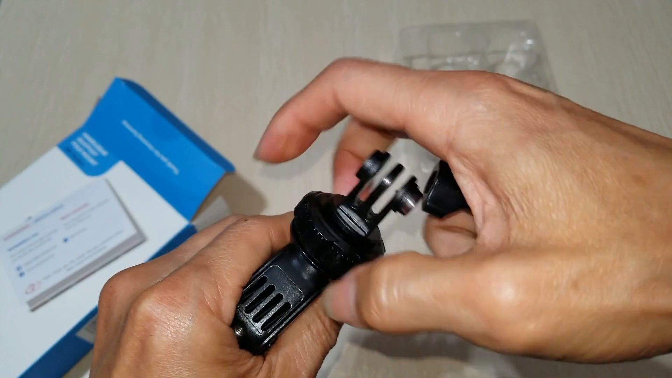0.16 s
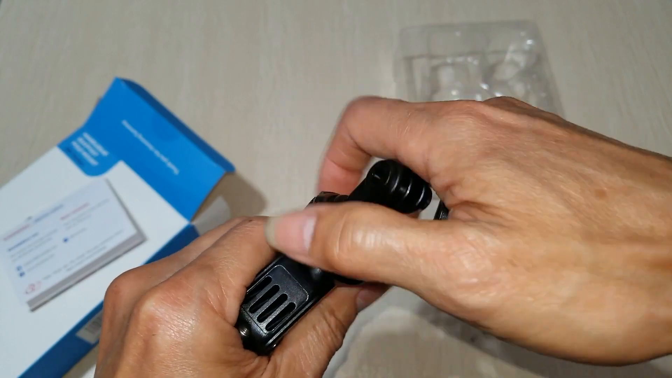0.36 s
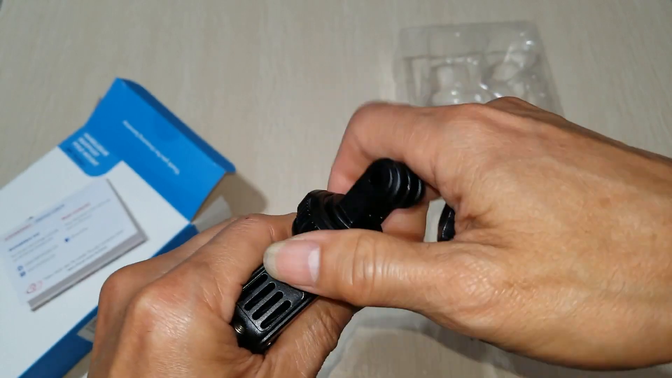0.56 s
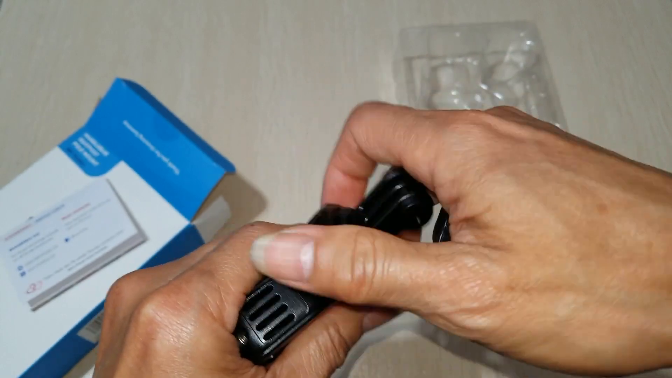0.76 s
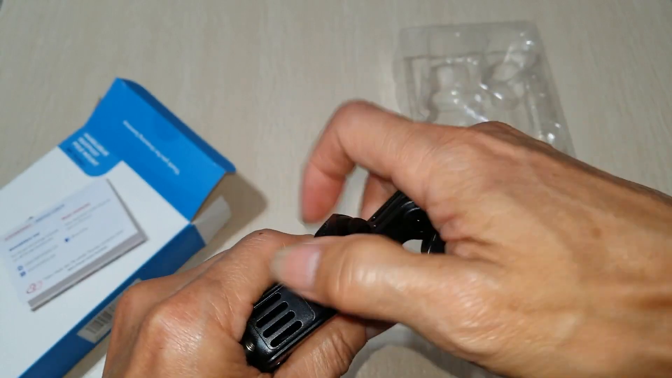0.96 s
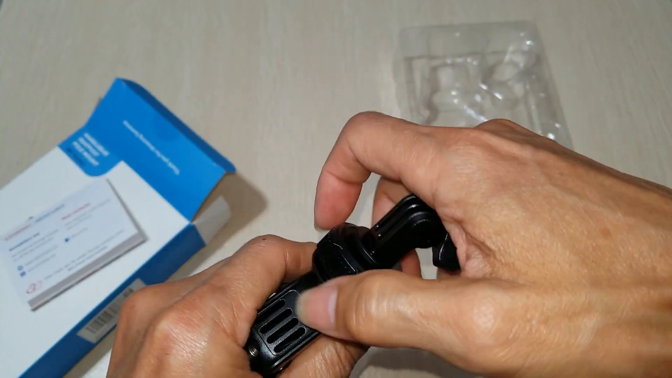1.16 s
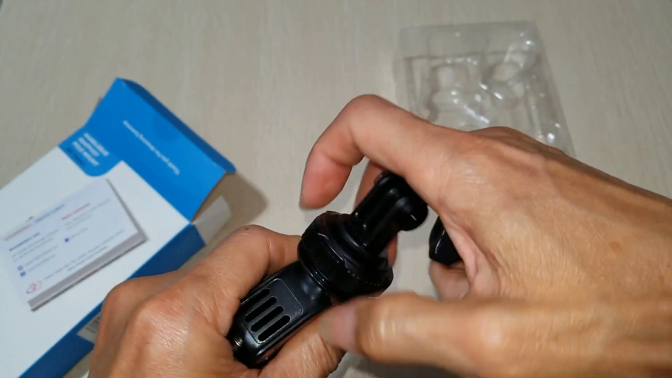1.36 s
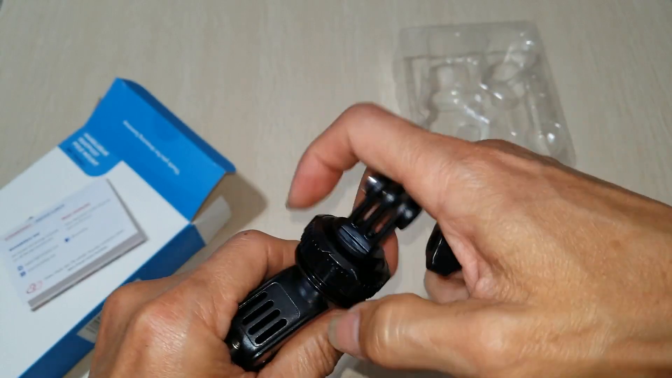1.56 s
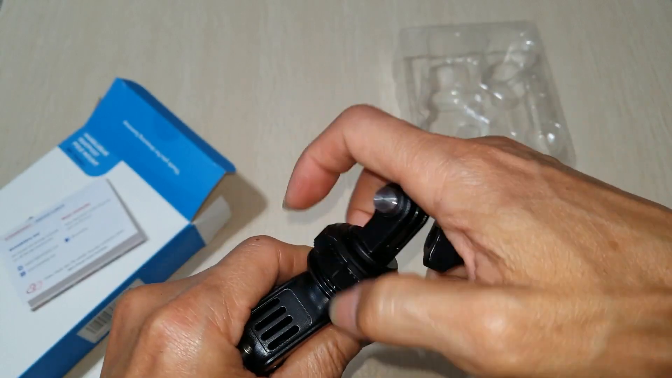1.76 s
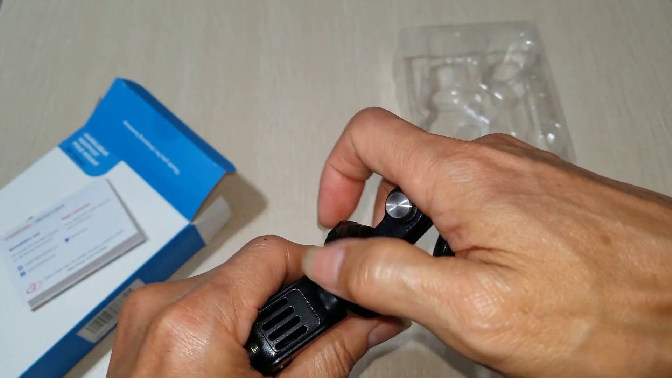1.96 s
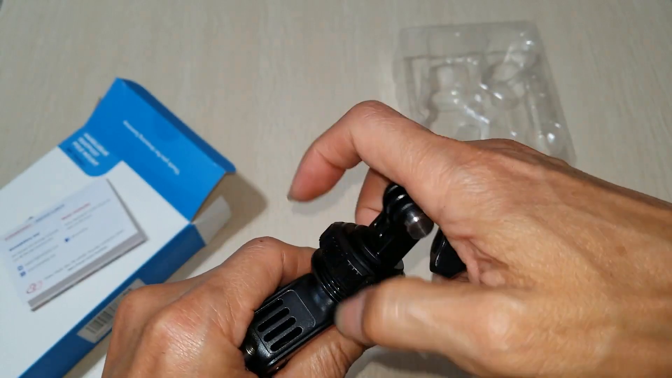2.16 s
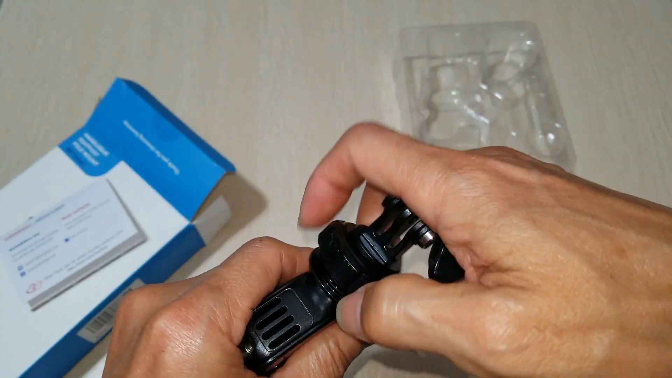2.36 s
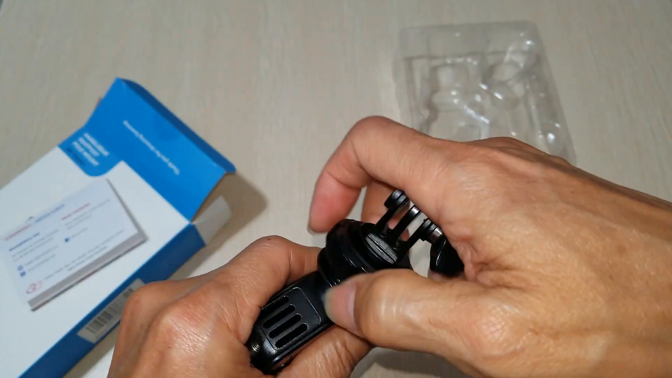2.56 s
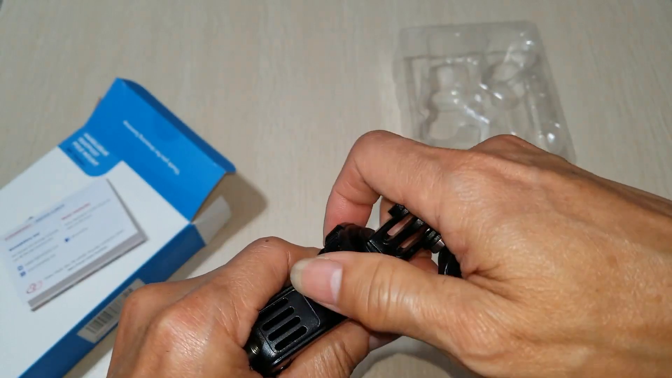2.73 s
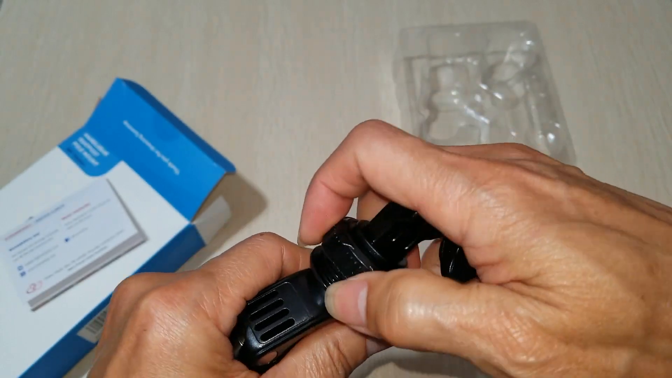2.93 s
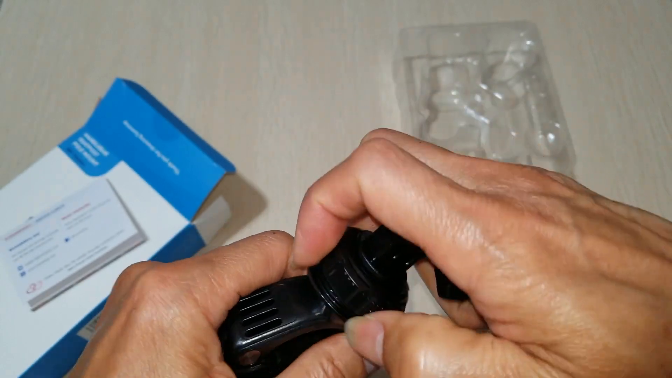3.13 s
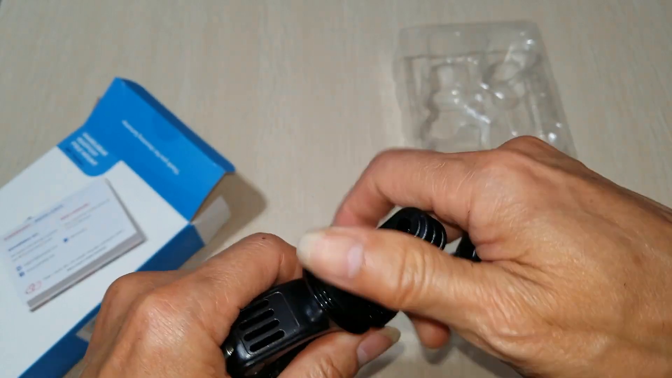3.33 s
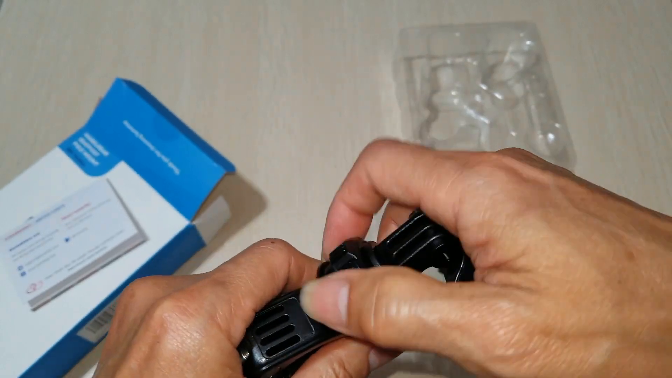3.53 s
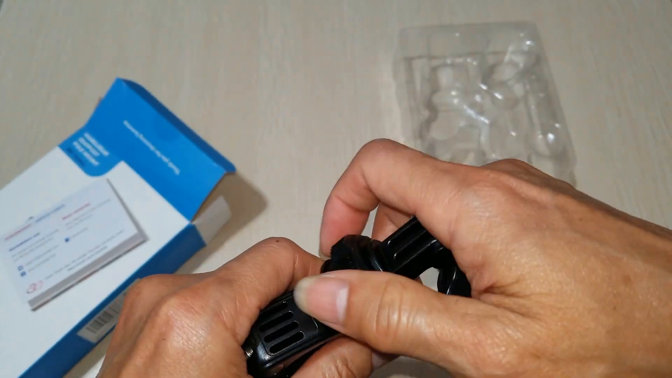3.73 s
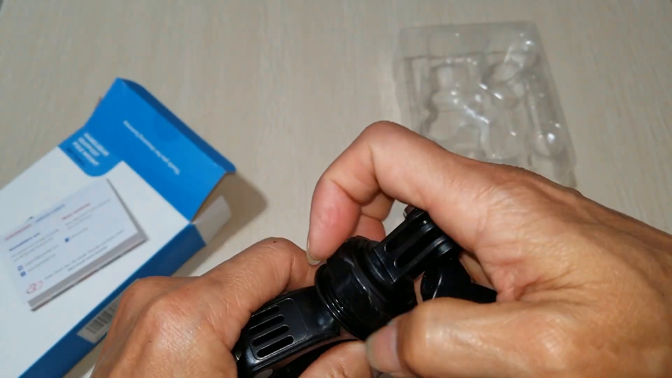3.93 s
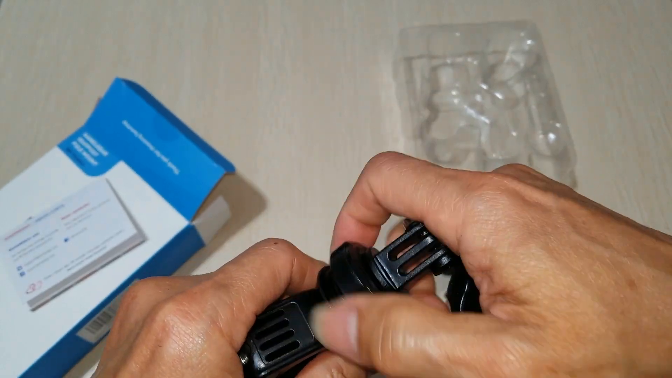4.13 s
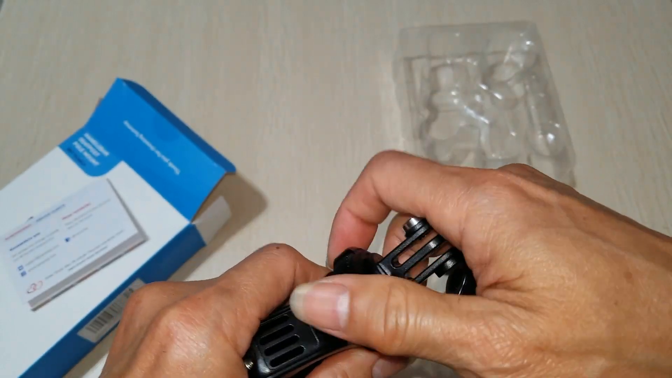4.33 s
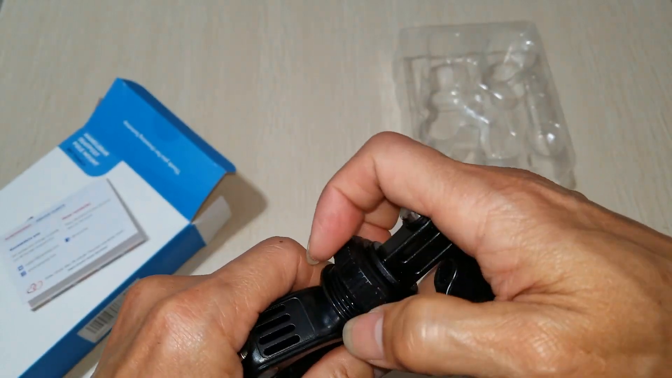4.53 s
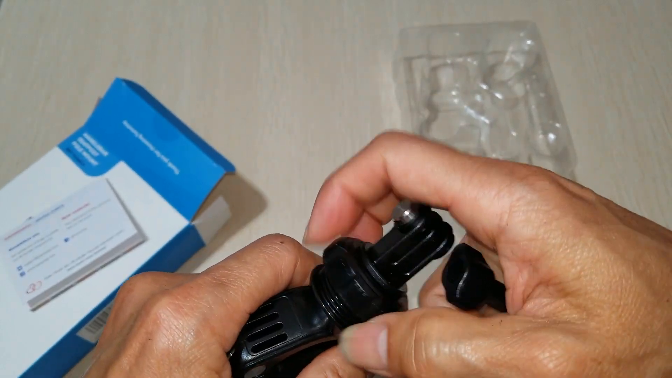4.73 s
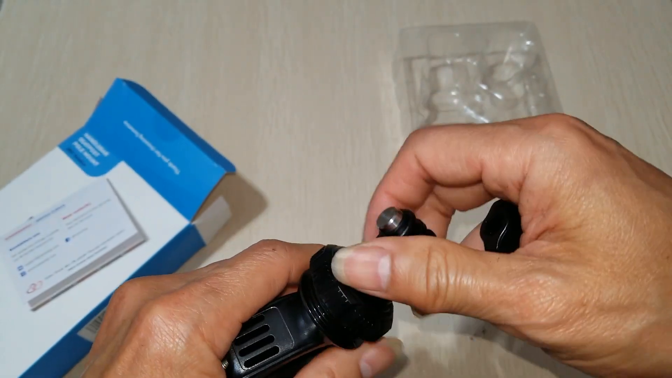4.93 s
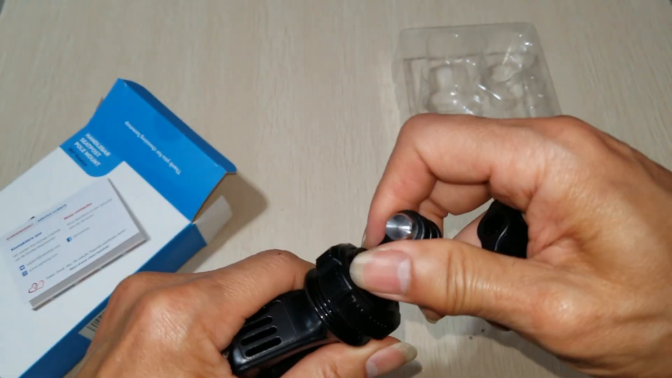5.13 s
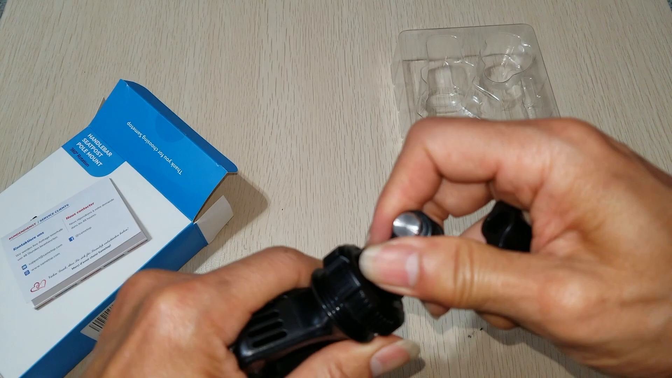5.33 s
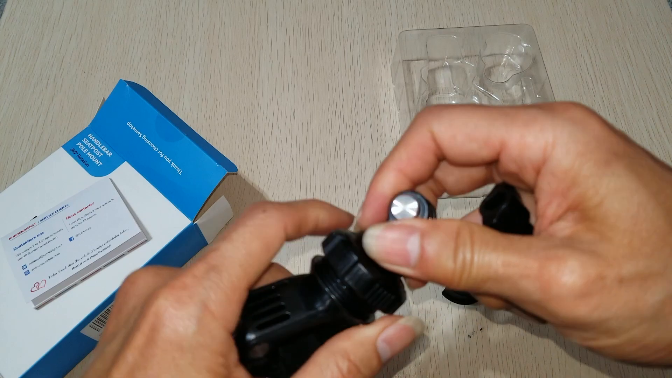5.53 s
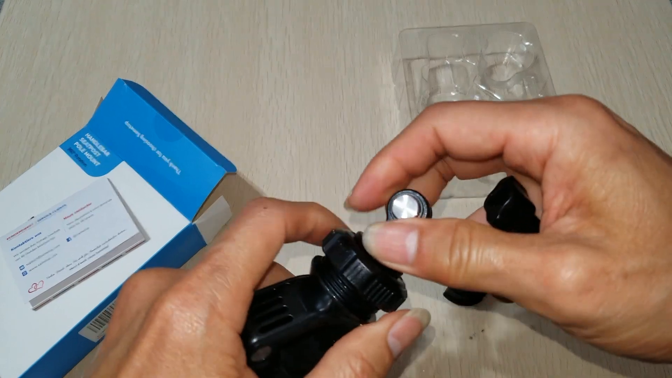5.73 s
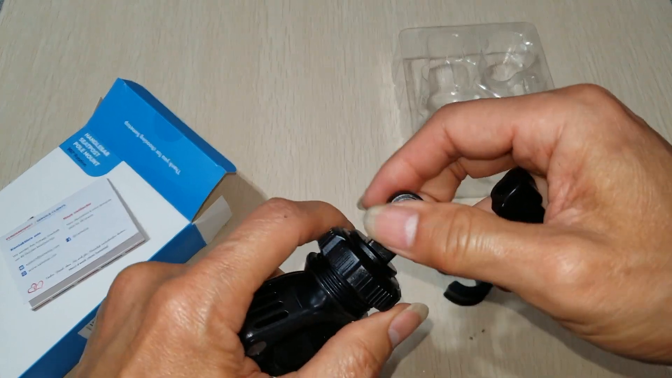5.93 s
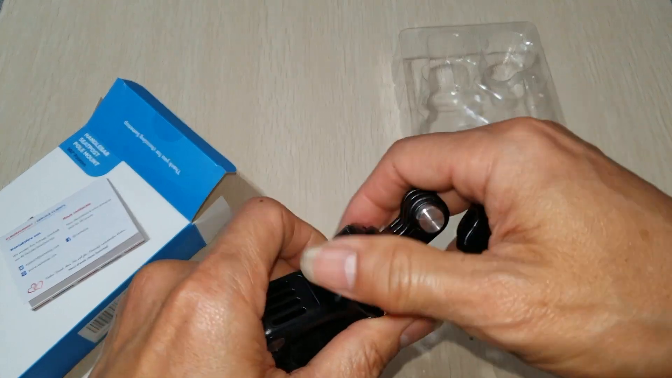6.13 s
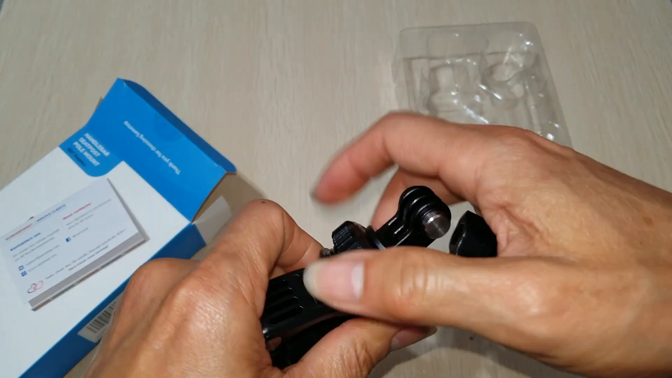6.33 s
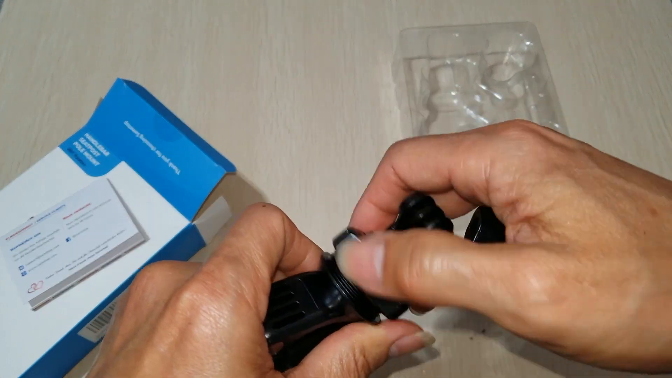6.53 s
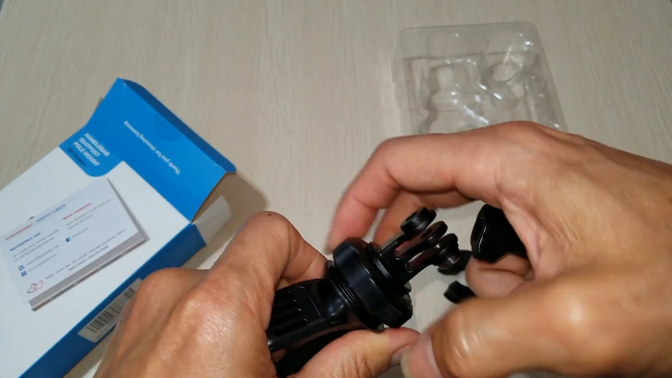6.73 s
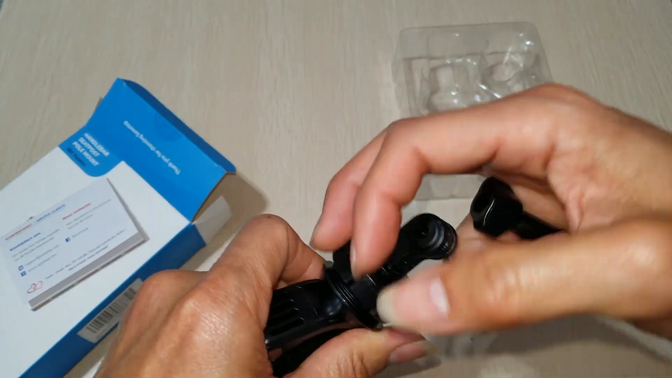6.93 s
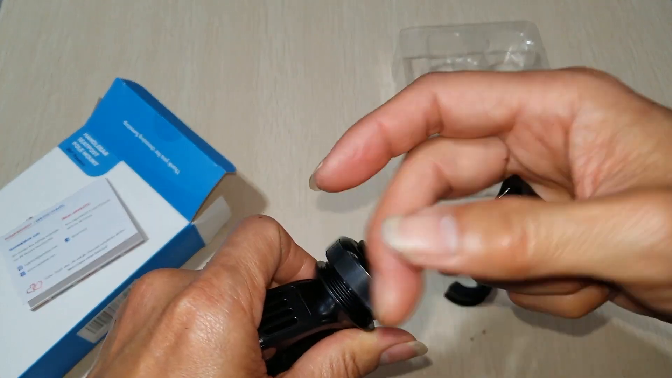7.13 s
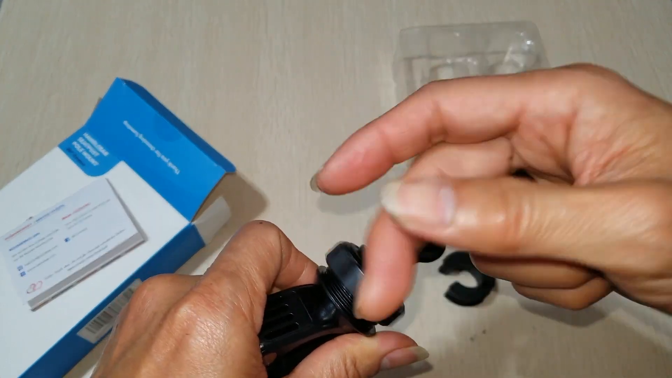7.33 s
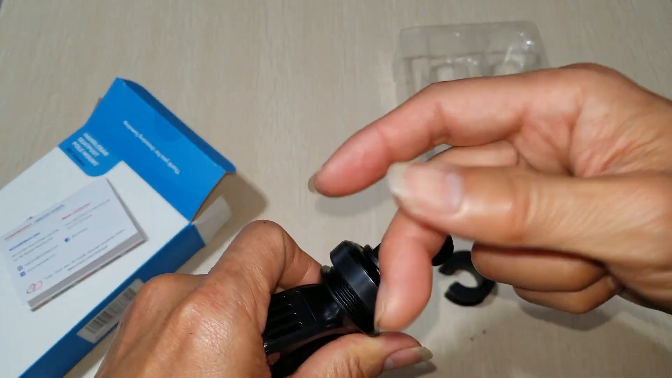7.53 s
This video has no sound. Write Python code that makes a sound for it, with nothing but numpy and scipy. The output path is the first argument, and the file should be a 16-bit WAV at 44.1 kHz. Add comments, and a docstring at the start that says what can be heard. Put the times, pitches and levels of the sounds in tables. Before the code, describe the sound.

Hard plastic parts click, tick and grind as fingers rotate a small mount joint right beside the microphones. Irregular bursts run about ten to twenty-five knocks a second, some dull, some sharp and bright. Activity is steady at first, breaks briefly, resumes, nearly stops past the middle, then grows busy and strong. The sound leans left, with little bass in the clicks, a tight room tail, and faint hiss over low rumble.

```python
"""A loose plastic swivel joint is turned by hand close to a pair of small microphones in a quiet room. It
knocks and rattles in short bursts, where tiny contacts ring its modes, and grinds as rough faces slide. Dense
decaying noise gives the brief echoes of the room; a short low pop sounds under the two sharpest knocks. Below
lie bass rumble that swells and hiss, both made of coloured noise, louder on the left."""
import sys
import numpy as np
from scipy import signal
from scipy.fft import rfft, irfft
from scipy.io import wavfile
from scipy.ndimage import uniform_filter1d

SR = 44100
rng = np.random.default_rng(int(sys.argv[2]) if len(sys.argv) > 2 else 0)


def log_audio(samples):
    """Write samples as a 16-bit WAV file to the path given in sys.argv[1]."""
    # one column per channel
    frames = np.atleast_2d(samples).T
    # limit to full scale, then quantise
    limited = np.clip(frames, -1, 1)
    pcm = np.round(limited * 32767).astype(np.int16)
    wavfile.write(sys.argv[1], SR, pcm)


N = 334719   # samples

# Knocks of the loose parts. Each row: moment of the main blow in seconds, level of the body ring in dB
# before the room answers, treble against body in dB, rattle length in ms (held to 0.2-12 when used).
KNOCKS = [(0.0406, -28.5, -23, 5.9), (0.063, -28, -12, 2.2), (0.0732, -18.5, -6.5, 1),
          (0.1327, -16, -7.5, 6.2), (0.1442, -24, -9, 2.2), (0.2095, -25, -13.5, 11),
          (0.2425, -23, -17, 1.2), (0.25, -25, -24, 1.2), (0.281, -23, -15, 4.1), (0.3037, -14, -11.5, 1.7),
          (0.363, -18, -11, 3.7), (0.379, -9.5, -2, 1.9), (0.3866, -19, 2, 2.8), (0.444, -15, -1.2, 3.1),
          (0.4695, -19.5, -7, 1.8), (0.5845, -22.5, -15, 0.67), (0.6311, -18.5, -10, 3.2),
          (0.698, -31, -3, 11), (0.7137, -31, -27, 3.1), (0.766, -28, -8, 3.6), (0.7807, -14, -21, 1.04),
          (0.7864, -16.5, -9, 2), (0.841, -33, -3, 7.8), (0.891, -33.5, -30, 1.8), (0.9228, -26, -23, 2.6),
          (0.9864, -37.5, -28, 0.68), (0.996, -43, 6.5, 2.2), (1.0157, -25.5, -10.5, 1.6),
          (1.0324, -27, -19, 3.2), (1.0768, -28.5, -18, 4.9), (1.108, -30, -19, 4.4),
          (1.1369, -20, -15.5, 1.1), (1.2107, -19.5, -17, 4), (1.238, -18, -11, 0.31),
          (1.2435, -24, -11, 3.7), (1.271, -21, -4.5, 4.5), (1.287, -32, -3, 4), (1.312, -23, -17, 3.5),
          (1.3293, -19.5, -6, 12), (1.339, -17.5, -23, 1.7), (1.3462, -21, -6.5, 0.9),
          (1.3827, -35, -28, 3.5), (1.4416, -26, -10, 2.4), (1.4755, -29.5, -13.5, 5.5),
          (1.4819, -30, -34, 3.9), (1.4948, -27, -12, 0.88), (1.5435, -18, -9, 5.7),
          (1.5649, -23, -9.5, 1.8), (1.5768, -19.5, -15, 0.66), (1.6529, -24.5, -25, 1.3),
          (1.6787, -23, -12, 1.5), (1.6938, -16.5, -5.5, 5.8), (1.7002, -17.5, 2, 0.57),
          (1.7117, -23, -21, 2.7), (1.828, -33.5, -17, 0.58), (1.8572, -29.5, -13, 1.5),
          (1.921, -35, -12, 1.5), (1.9419, -24, -15, 2.1), (2.0592, -27, -10.5, 2.4),
          (2.0882, -30.5, 1, 2.9), (2.1334, -24, -7.5, 9.9), (2.1422, -25, -12, 2.4),
          (2.1571, -28, -14, 1.2), (2.2324, -26, -11, 4.1), (2.2645, -22.5, -12.5, 1.9),
          (2.305, -31.5, 0.5, 1.5), (2.3648, -28, -10.5, 9.2), (2.468, -33.5, -5, 2.3),
          (2.484, -19, -4, 2.3), (2.49, -24.5, -5, 2.2), (2.57, -41, 2, 1.3), (2.581, -15, -11, 1.2),
          (2.5868, -10, 0.8, 4.2), (2.6868, -30.5, -13, 0.33), (2.7147, -47, -18, 2.1),
          (2.75, -34.5, -11, 0.21), (3.184, -18, 2.5, 2.5), (3.237, -29.5, -15, 3.9),
          (3.332, -26, -19, 5.8), (3.346, -15.5, 2.5, 1.6), (3.3731, -22.5, -25, 2.2),
          (3.4081, -17.5, -5, 0.67), (3.4482, -39, -18, 0.59), (3.463, -19.5, -6.5, 2.1),
          (3.537, -20, -11, 1.4), (3.5532, -21, -6, 5), (3.5632, -24.5, -9, 4.4),
          (3.5826, -21.5, -2.5, 2.7), (3.7081, -20, -12, 1.5), (3.943, -33.5, 0, 3.1),
          (3.9613, -15.5, 1, 1.1), (3.9756, -23, -16, 6.9), (4.0844, -36, -27, 2.6),
          (4.1231, -22.5, -7, 3.3), (4.1734, -17, 0, 1.6), (4.1799, -15.5, -6, 14),
          (4.202, -16.5, -10.5, 2.9), (4.255, -46, 3, 1.5), (4.2748, -22.5, -13, 2.3),
          (4.3185, -24.5, -8.5, 3.9), (4.388, -22.5, -10.5, 2.1), (4.402, -22.5, -8.5, 0.59),
          (4.724, -15.5, -0.5, 4.4), (4.8985, -30.5, 6, 2), (4.9174, -34, 11, 2.8), (4.9549, -33, -6, 0.93),
          (5.6026, -46.5, 0, 4.6), (5.9541, -40.5, -6, 0.76), (6.093, -40, -8, 1.7),
          (6.112, -23.5, -9.5, 2.3), (6.144, -16.5, -11, 1.5), (6.1745, -30.5, -8, 5),
          (6.2209, -20.5, -10, 4.1), (6.3375, -20.5, -0.5, 2.7), (6.395, -28.5, -10, 7.7),
          (6.4122, -19.5, -5, 2.8), (6.421, -35, -24, 1.8), (6.4997, -27.5, -9.5, 2.1), (6.527, -25, -4, 3),
          (6.541, -13, -4.5, 2.3), (6.5646, -13.5, -9.5, 1.9), (6.5849, -18, -19, 3.7),
          (6.663, -18, -12.5, 9.1), (6.6817, -21.5, -15, 2.8), (6.7216, -22, -21, 11),
          (6.7423, -26.5, -6, 3.5), (6.799, -30.5, -19, 3), (6.8568, -14.5, -16, 15),
          (6.8655, -28, -5, 1.4), (6.942, -24, -7, 2.3), (6.9529, -14.5, -15, 3.1),
          (6.9602, -14.5, -4, 3.8), (7.0399, -11, -4, 2.6), (7.0671, -23, -3, 5.7),
          (7.1176, -24, -4.5, 6.3), (7.2525, -11.5, -6, 4), (7.307, -22, -4.5, 14), (7.3423, -26, -2, 9.2),
          (7.3654, -23, -0.5, 12), (7.3793, -19.5, -4, 6.3), (7.4431, -8.5, -1.9, 1.6),
          (7.4783, -21, -4, 2), (7.5166, -29.5, -3.5, 6.8)]
# Modes of the plastic joint. Each row: middle pitch in Hz, relative level in dB, time to fall 60 dB in seconds.
MODES = [(740, -29, 0.012), (950, -9, 0.0056), (1225, -8.5, 0.017), (1572, -0.5, 0.0044),
         (1616, -7.5, 0.0041), (2044, 0.5, 0.0058), (2121, 2, 0.0089), (2490, -2, 0.0071),
         (2538, -3.5, 0.013), (2750, -7.5, 0.0062), (3014, -4.5, 0.0075), (3390, -1.5, 0.0063),
         (3734, -5, 0.0071), (4343, -2.5, 0.0064), (5370, 7, 0.0031), (6505, 1.5, 0.0083),
         (7270, -20, 0.042), (8330, 2.5, 0.0066), (9360, -9.5, 0.021), (10130, 3, 0.0045),
         (12050, -11.5, 0.018), (11570, -7.5, 0.0031), (12500, 3.5, 0.0028), (14400, 7, 0.0034)]
LEAD_MS = 5   # room for the rattle ahead of each main blow
ROLL_OFF_HZ = 15750   # where the top of the microphones ends


def from_db(db):
    """Decibels to gain."""
    return 10 ** (np.asarray(db) / 20)


def at_hz(points, hz):
    """Reads a (Hz, value) table on a log frequency axis."""
    point_hz, values = np.transpose(points)
    return np.interp(np.log(hz), np.log(point_hz), values)


def joint():
    """Knocks and grinding of one small body that radiates little bass, at two unequal distances."""
    small_body_hz, bass_left_db = 836, -17.5
    sound = knocks() + grinding(count=6)
    right_lag = 5   # samples: the right microphone is a little farther away
    sound[1] = np.roll(sound[1], right_lag)
    sound[1] = signal.lfilter(*signal.butter(1, 500, "high", fs=SR), sound[1])   # and thinner in the lows
    high_pass = signal.butter(5, small_body_hz, "high", fs=SR, output="sos")
    return signal.sosfilt(high_pass, sound) + from_db(bass_left_db) * sound


def knocks():
    """Each knock's force rings its body and treble modes, then the room."""
    s, level_db, treble_db, length_ms = np.transpose(KNOCKS)
    force = rattles(length_ms, count=1100)[:, None]
    centre_hz, cover_db = grip(s, treble_db)
    rings = bodies(treble_db, centre_hz, cover_db, count=600)
    body, treble = [peak_one(signal.fftconvolve(force, ring, axes=2)) for ring in rings]
    bursts = body + from_db(treble_db)[:, None, None] * treble
    bursts *= from_db(level_db)[:, None, None]
    bursts = signal.fftconvolve(bursts, echoes(len(s)), axes=2)
    length = bursts.shape[2]
    out = np.zeros((2, N + length))
    starts = np.round((s - LEAD_MS / 1000) * SR).astype(int)
    for start, burst in zip(starts, bursts):
        out[:, start:start + length] += burst
    return out[:, :N]


def rattles(length_ms, count):
    """The force of each knock: tiny contacts swell to a main blow and die away about four times slower."""
    t_ms = np.arange(count) / SR * 1000 - LEAD_MS
    length_ms = np.clip(length_ms, 0.2, 12)[:, None]
    swell = np.exp(np.where(t_ms < 0, t_ms / (0.52 * length_ms), -t_ms / (2.07 * length_ms)))
    blow = np.abs(t_ms) == np.abs(t_ms).min()
    ticks = contacts((len(length_ms), count), per_s=3900, spread_db=5.0)
    return ticks * swell + 2.77 * blow


def contacts(shape, per_s, spread_db):
    """Tiny contacts at random moments pushing either way, mostly weak, a few strong; rms 1."""
    sizes = from_db(spread_db * np.minimum(rng.exponential(1, shape), 4))
    pushes = sizes * rng.choice([-1, 1], shape)
    hits = pushes * (rng.random(shape) < per_s / SR)
    return hits / np.sqrt(np.mean(hits ** 2))


def bodies(treble_db, centre_hz, cover_db, count):
    """Stereo ring of body and of treble per knock: decaying sines, shifted and weighted anew each time."""
    # How much nearer the left microphone is. Each row: frequency in Hz, left against right in dB.
    nearer_left = [(770, 12), (1100, 9), (1500, 6), (2400, 5), (4400, 6), (8000, 9), (15000, 10.5)]
    treble_from_hz, pitch_spread_hz, level_spread_db = 4800, 35, 2
    hz, mode_db, t60 = np.transpose(MODES)
    # random parts per mode: pitch, common level, left level, right level
    luck = rng.standard_normal((len(treble_db), 4, len(MODES)))
    t = np.arange(count) / SR
    pitch_hz = hz + pitch_spread_hz * luck[:, 0]
    rings = np.sin(2 * np.pi * pitch_hz[:, :, None] * t) * from_db(-60 * t / t60[:, None])

    is_treble = hz > treble_from_hz
    centre_hz = centre_hz[:, None, None]
    softness = np.clip(-treble_db, 0, 30)[:, None, None]
    # where the blow lands leans the body up or down
    tilt_db = 25 * np.log2(centre_hz / 2350) * np.log2(np.clip(hz, 1300, 3400) / 2350)
    # soft blows reach only the modes near their centre
    narrow_db = -0.9 * softness * np.log2(hz / centre_hz) ** 2
    sides_db = at_hz(nearer_left, hz) * [[0.5], [-0.5]] + level_spread_db * luck[:, 2:]
    level_db = mode_db + cover_db + level_spread_db * luck[:, 1:2] + sides_db
    level_db = level_db + (tilt_db + narrow_db) * ~is_treble
    gains = from_db(level_db) * (-1) ** np.arange(len(hz))   # neighbouring modes start opposite ways
    # short waves: the right side may face the opposite lobe
    gains[:, 1] *= np.where(is_treble & (luck[:, 3] > 1), -1, 1)
    return (gains * ~is_treble) @ rings, (gains * is_treble) @ rings


def grip(s, treble_db):
    """How the fingers hold and cover the joint: centre of the ring in Hz and extra dB per mode at moments s."""
    # Each row: moment in seconds, centre of the body ring for a hard knock in Hz,
    # change of the lowest modes in dB, change of the highest modes in dB.
    holds = [(0.1, 2580, -8, -6), (0.7, 2770, 3.5, -2), (1.3, 2400, -2, 3), (2.1, 2480, -4.5, -0.5),
             (2.6, 2540, -3.2, -8), (3.5, 2550, 5, -4), (3.95, 2930, 4, -11), (4.12, 2310, -0.5, -4),
             (4.35, 2950, -1, -3), (4.73, 2900, -7, 6.5), (4.96, 2120, 1, 7), (6.2, 2960, -16, -1.5),
             (6.7, 2750, 2, -2.5), (7.4, 2870, -6, 3)]
    sag_hz_per_db = 23.5   # duller knocks ring lower
    lowest_to_hz, highest_from_hz = 1400, 11000
    moments, *columns = np.transpose(holds)
    centre_hz, low_db, high_db = [np.interp(s, moments, column) for column in columns]
    hz = np.transpose(MODES)[0]
    cover_db = low_db[:, None] * (hz < lowest_to_hz) + high_db[:, None] * (hz > highest_from_hz)
    return centre_hz + sag_hz_per_db * np.minimum(treble_db, 0), cover_db[:, None]


def peak_one(x):
    """Scales each stereo burst so that its loudest millisecond and a half has power 1, both sides summed."""
    power = uniform_filter1d(np.sum(x ** 2, axis=1), size=66, axis=1)
    return x / np.sqrt(power.max(axis=1))[:, None, None]


def echoes(positions):
    """Direct sound plus dense echoes from table and walls, separate for each joint position and channel."""
    first_db = -32.5   # the echoes per sample against the direct sound, ahead of their decay
    low_t60_s, treble_t60_s = 0.12, 0.14
    t = np.arange(SR // 7) / SR
    noise = rng.standard_normal((positions, 2, len(t)))
    low = signal.sosfilt(signal.butter(2, 4000, fs=SR, output="sos"), noise)
    tail = low * from_db(-60 * t / low_t60_s)
    tail += 0.71 * (noise - low) * from_db(-60 * t / treble_t60_s)
    tail *= from_db(first_db) * np.clip(t / 0.00087, 0, 1)   # the first echoes need a moment to arrive
    tail[:, :, 0] = 1   # direct sound
    return tail


def grinding(count):
    """Rough faces sliding: uneven ticks under the hand's effort, brighter where the knocks are brighter."""
    t = np.arange(N) / SR
    force = effort() * contacts(N, per_s=600, spread_db=4.5)
    s, _, treble_db, _ = np.transpose(KNOCKS)
    bright = from_db(0.5 * np.interp(t, s, treble_db) - 6)
    # the spot that touches is drawn anew every 200 samples
    spots = rng.integers(0, count, N // 200 + 1).repeat(200)[:N]
    rings = bodies(np.full(count, -11.0), np.full(count, 2200.0), 0, count=600)
    body, treble = [ring / np.std(ring) / np.sqrt(ring.shape[2]) for ring in rings]
    out = 0
    for k in range(count):
        ticks = (force * (spots == k))[None]
        out = out + signal.oaconvolve(ticks, body[k], axes=1)
        out = out + signal.oaconvolve(ticks * bright, treble[k], axes=1)
    return signal.oaconvolve(out, echoes(1)[0], axes=1)[:, :N]


def effort():
    """Strength of the grinding: scrapes rise, hold and fall; loose parts chatter up to and on after each knock."""
    # The hand pushes the joint round. Each row: start in seconds, length in seconds, relative level in dB.
    scrapes = [(-0.004, .13, -40), (0.255, 0.18, -42), (0.504, .1, -46.5), (0.62, .15, -37),
               (0.84, 0.097, -52), (0.978, .1, -44.5), (1.136, .06, -54), (1.238, 0.047, -34),
               (1.37, .06, -55), (1.47, 0.066, -35.5), (1.605, .05, -47), (1.665, 0.077, -33.5),
               (1.76, .1, -57), (1.89, 0.048, -54), (2.048, 0.056, -44), (2.221, .1, -40), (2.448, .1, -49),
               (3.132, 0.11, -45), (3.348, 0.11, -33.5), (3.525, 0.034, -33.5), (4.118, 0.018, -37),
               (4.316, .11, -46.5), (4.795, 0.22, -60.5), (5.439, 0.027, -57.5), (6.107, 0.12, -42),
               (6.352, 0.077, -38), (6.537, 0.023, -30.5), (6.696, 0.053, -38), (6.836, 0.034, -34.5),
               (6.937, 0.029, -50), (7.061, 0.098, -37.5), (7.273, 0.16, -34), (7.448, 0.018, -29.5),
               (7.519, 0.039, -38)]
    scrape_rise, scrape_fall = 689, 356   # dB per second
    shake_db, shake_rise, shake_fall = -21.5, 1899.5, 321   # dB against the knock's level, then dB per second
    t = np.arange(0, N, 64)[:, None] / SR
    start, length, level_db = np.transpose(scrapes)
    slopes_db = scrape_rise * np.maximum(start - t, 0) + scrape_fall * np.maximum(t - start - length, 0)
    scrape = from_db(level_db - slopes_db)
    s, knock_db = np.transpose(KNOCKS)[:2]
    shake = from_db(knock_db + shake_db - np.where(t < s, shake_rise, shake_fall) * np.abs(t - s))
    power = np.sum(scrape ** 2, axis=1) + np.sum(shake ** 2, axis=1)
    return np.interp(np.arange(N) / SR, t[:, 0], np.sqrt(power))


def pops():
    """A one-sided push about a millisecond long under two sharp knocks, 8 dB weaker on the right."""
    # Each row: moment in seconds, peak on the left in dB.
    pushes = [(0.388, -29), (7.442, -35)]
    t = np.arange(N) / SR
    push = sum(from_db(db) * np.exp(-((t - s) / 0.00046) ** 2) for s, db in pushes)
    return push * from_db([[0], [-8]])


def floor():
    """Room rumble and microphone hiss: noise coloured bin by bin, alike in both channels mostly in the bass."""
    # Colour of the noise. Each row: frequency in Hz, relative density in dB per Hz.
    colour = [(18, -71), (30, -21), (55, -4.5), (144, -14), (214, -18.5), (293, -18.5), (334, -19),
              (445, -19.5), (904, -24.5), (1490, -21), (1930, -15.5), (2580, -24), (7740, -35),
              (12100, -21.5), (15700, -26.5)]
    # The louder left microphone, resonant near 1950 Hz. Each row: frequency in Hz, left against right in dB.
    balance = [(60, 4), (300, 2.5), (1100, 4.5), (1500, 10), (1950, 18.5), (2600, 3), (4000, 2.5),
               (8000, 3.5), (15000, 12.5)]
    # Each row: frequency in Hz, likeness of the two channels from 0 to 1.
    likeness = [(50, 0.8), (130, 0.18), (300, 0.2), (1400, 0), (4000, 0.05)]
    # Swells of the bass rumble. Each row: moment in seconds, change of level in dB.
    swells = [(0, -3.5), (1.9, -0.5), (2.2, 3), (2.6, -3.5), (3.4, -2), (3.7, 5), (4.1, -0.5), (7.59, -1)]
    level_db, rumble_to_hz = -58, 120   # level: both channels averaged
    hz = np.maximum(np.fft.rfftfreq(N, 1 / SR), 1)
    mid, side = rfft(rng.standard_normal((2, N)))
    alike = np.clip(at_hz(likeness, hz), 0, 1)
    pair = np.sqrt(1 + alike) * mid + np.sqrt(1 - alike) * side * [[1], [-1]]
    pair *= from_db(at_hz(colour, hz) + at_hz(balance, hz) * [[0.5], [-0.5]])
    pair *= hz < ROLL_OFF_HZ
    rumble = irfft(pair * (hz < rumble_to_hz), N)
    hiss = irfft(pair * (hz >= rumble_to_hz), N)
    swell_db = np.interp(np.arange(N) / SR, *np.transpose(swells))
    noise = hiss + rumble * from_db(swell_db)
    return from_db(level_db) * noise / np.std(noise.mean(axis=0))


def scene():
    """The joint in its room, the pops and the floor."""
    return joint() + pops() + floor()


def record(dry):
    """The highest peaks are clipped, the top rolls off and is cut."""
    cutoff_hz = 16950
    clipped = np.clip(dry, -1, 1)
    dull = signal.sosfilt(signal.ellip(4, 1, 9, ROLL_OFF_HZ, fs=SR, output="sos"), clipped)
    return signal.sosfilt(signal.cheby2(10, 50, cutoff_hz, fs=SR, output="sos"), dull)


dry = scene()
out = record(dry)
log_audio(out)
```